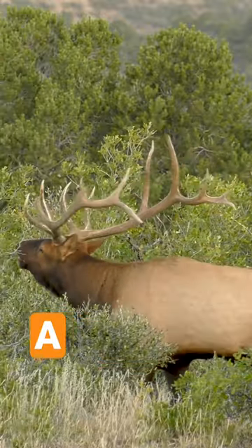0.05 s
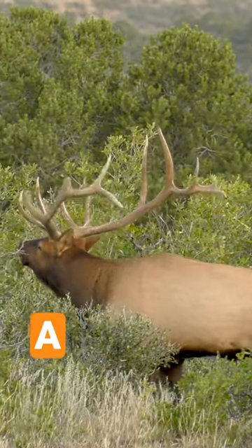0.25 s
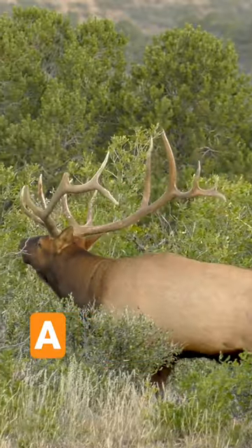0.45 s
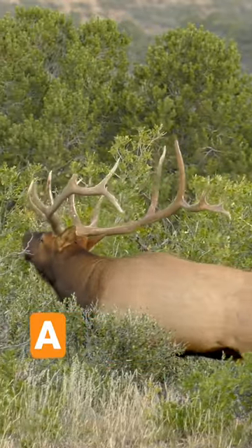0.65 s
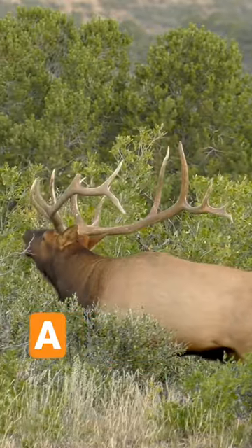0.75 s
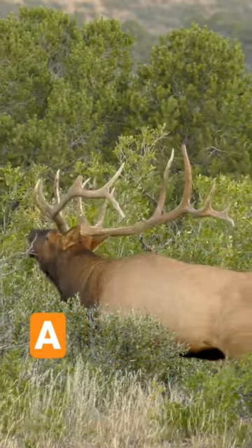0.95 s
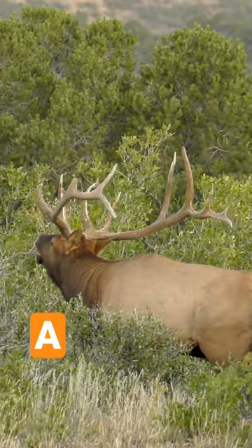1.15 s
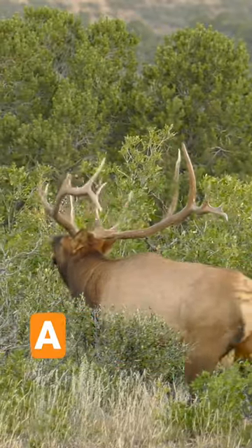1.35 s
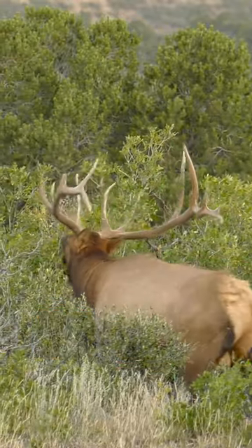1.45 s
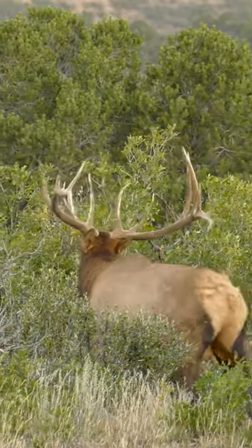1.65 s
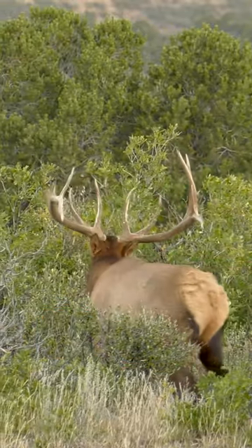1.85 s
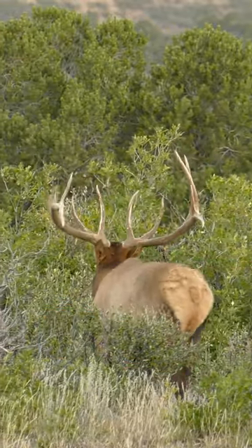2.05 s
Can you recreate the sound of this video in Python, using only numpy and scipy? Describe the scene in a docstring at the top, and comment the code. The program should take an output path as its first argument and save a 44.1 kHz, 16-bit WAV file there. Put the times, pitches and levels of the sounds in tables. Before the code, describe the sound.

Bull elk chirps a few brief, falling whistles with low grunts, over soft outdoor hiss and insects.

```python
"""Elk calling in brushy woodland

An elk gives short whistling calls, most of them falling sharply: near-sine tones that ring a long throat.
Low grunts are pulse trains mixed with noise, and puffs of air are bands of noise.
Slopes and trees throw the voice back as smeared echoes and a scattered tail.
Insects trill and buzz as bands of noise over a wavering low hum and outdoor hiss.
"""
import sys
import numpy as np
from scipy import signal
from scipy.fft import rfft, irfft
from scipy.io import wavfile
from scipy.ndimage import uniform_filter1d

SR = 44100
rng = np.random.default_rng(int(sys.argv[2]) if len(sys.argv) > 2 else 0)


def store_pcm(level_fs):
    """Save levels as 16-bit WAV."""
    pcm = np.round(np.clip(level_fs, -1, 1) * 32767).astype(np.int16)
    wavfile.write(sys.argv[1], SR, np.atleast_2d(pcm).T)


def decibels_to_gain(level_db):
    """Convert a level in decibels to a linear amplitude gain (20 dB per decade)."""
    exponent = np.asarray(level_db, float) / 20
    return 10 ** exponent


N = 92610  # samples

# Stereo balance of air, hum and echoes. Each row: frequency in Hz, left minus right in dB.
TILT = [(60, -2.5), (150, -0.5), (380, -4), (950, 0.5), (2380, -4.0), (5980, -4), (15000, -1.5)]


def evened(x):
    """Scales to rms 1."""
    return x / np.sqrt(np.mean(x ** 2) + 1e-20)


def read(points, hz):
    """Reads a spectrum table along a log frequency axis."""
    f, value = np.transpose(points)
    return np.interp(np.log(hz + 1), np.log(f + 1), value)


def curve(points):
    """Reads a (seconds, value) table at every sample."""
    s, value = np.transpose(points)
    return np.interp(np.arange(N) / SR, s, value)


def add(mix, s, sound):
    """Mixes a sound in at time s."""
    part = mix[round(s * SR):][:len(sound)]
    part += sound[:len(part)]


def wander(size):
    """Slow random drift of rms 1: noise averaged over size samples."""
    return evened(uniform_filter1d(rng.standard_normal(N), size=size))


def resonate(x, hz, width):
    """A resonance of gain 1: the sound is shifted down to 0 Hz, smoothed and shifted back."""
    turn = np.exp(2j * np.pi * hz * np.arange(len(x)) / SR)
    r = np.exp(-np.pi * width / SR)
    return 2 * (turn * signal.lfilter([1 - r], [1, -r], x / turn)).real


def steep(x, hz, width):
    """Two equal resonances in a row, scaled to rms 1."""
    return evened(resonate(resonate(x, hz, width), hz, width))


def band(hz, width):
    """Noise in a steep resonance."""
    return steep(rng.standard_normal(N), hz, width)


def whistle(rows):
    """A near sine follows its pitch and level; its weak overtones brighten with effort."""
    # Overtones. Each row: multiple of the pitch, level in dB before effort and mouth colour.
    overtones = [(2, -26), (3, -28.5)]
    # Colour the mouth gives the overtones. Each row: frequency in Hz, gain in dB.
    mouth = [(1200, -17), (1650, -23), (2000, -23), (2350, -1), (2520, -1), (2700, -4), (2850, -6),
             (3050, 5), (3700, -10), (4300, 4), (4450, -14.5), (4600, 0.5)]
    wobble_share = 0.0026  # rms, of the pitch
    brighten, loud_db = 0.13, -37.5  # dB gained for each dB of effort over loud_db
    s, hz, db = np.transpose(rows)
    t = np.arange(s[0], s[-1], 1 / SR)
    pitch = uniform_filter1d(np.interp(t, s, hz), size=88)
    wobble = wander(200)[:len(t)]
    turn = 2 * np.pi * np.cumsum(pitch * (1 + wobble_share * wobble)) / SR
    level_db = np.interp(t, s, db)
    effort_db = brighten * (level_db - loud_db)
    tone = np.sin(turn)
    for k, overtone_db in overtones:
        tone = tone + decibels_to_gain(overtone_db + effort_db + read(mouth, k * pitch)) * np.sin(k * turn)
    return np.sqrt(2) * decibels_to_gain(level_db) * tone


def whistles():
    """All whistled tones, each a sine source ahead of the throat."""
    # Whistles, one list each. Each row: time in seconds, pitch in Hz, level in dB before the throat.
    # In the first call a lower tone lingers under the break (second list), an upper one stays over
    # the fall (third) and a thin side tone joins (fourth). The eighth is a faint, far answer.
    calls = [
        [(.15, 1052, -66), (.168, 1077, -53.5), (.18, 1189, -57), (.206, 1229, -40.5), (.236, 1255, -35.5),
         (.25, 1251, -42), (.256, 1387, -38.5), (.285, 1429, -40), (.302, 1443, -35.5), (.311, 1428, -70),
         (.322, 1385, -37), (.342, 1219, -25), (.349, 1218, -29.5), (.354, 871, -40.5), (.38, 846.6, -33.5),
         (.4, 824.4, -36.5), (.405, 507, -29.5), (.42, 460, -32), (.436, 415, -29.5), (.444, 300, -50.5),
         (.455, 220, -40.5), (.475, 180, -62)],
        [(.248, 1252, -48), (.26, 1246, -46), (.29, 1280, -68), (.31, 1240, -73)],
        [(.348, 1240, -58), (.358, 1308, -29), (.368, 1278, -48), (.4, 1253, -45.5), (.44, 1294, -65),
         (.47, 1350, -79)],
        [(.325, 1640, -60), (.34, 1650, -50), (.37, 1655, -60), (.41, 1690, -57), (.45, 1710, -69)],
        [(.874, 1392, -75), (.883, 1372, -54), (.912, 1268, -47), (.928, 1196, -32.5), (.936, 1133, -39),
         (.941, 925, -40), (.946, 799, -42.5), (.952, 786, -38), (.955, 660, -41), (.959, 603, -32.5),
         (.965, 545, -64), (.971, 524, -36.5), (.977, 495, -41.5), (.981, 474, -46), (.99, 460, -56)],
        [(1.243, 1543, -73), (1.258, 1556, -39.5), (1.272, 1506, -36), (1.318, 1535, -28), (1.33, 1489, -36),
         (1.342, 1442, -33.5), (1.353, 1354, -44), (1.359, 1184, -31.5), (1.365, 995, -49.5), (1.37, 767, -43),
         (1.377, 645, -33.5), (1.382, 604, -74), (1.386, 577, -46), (1.392, 560, -60)],
        [(1.71, 1463, -97), (1.75, 1457, -54), (1.762, 1440, -53), (1.776, 1185, -43), (1.788, 821, -46),
         (1.798, 638, -39.5), (1.812, 640, -58), (1.825, 610, -64)],
        [(1.8, 1480, -66), (1.812, 1480, -50), (1.822, 1475, -68), (1.835, 1475, -53.5), (1.87, 1460, -63),
         (1.9, 1455, -66), (1.97, 1480, -67)],
        [(1.995, 660, -64), (2.008, 600, -60), (2.016, 585, -38.5), (2.028, 570, -74)],
        [(2.012, 1410, -62), (2.025, 1360, -46.5), (2.035, 1294, -59), (2.043, 1140, -50.5), (2.058, 1170, -57)],
    ]
    tone = np.zeros(N)
    for rows in calls:
        add(tone, rows[0][0], whistle(rows))
    return tone


def grunt(length, hz, db, rough):
    """Slow vocal fold pulses of sagging pitch, with noise that decays in each cycle."""
    sag, rise = 0.2, 0.45  # shares of pitch and of length
    slope = 0.5  # fall of the harmonics, as a power of their number
    u = np.arange(0, length, 1 / SR) / length
    noise = rng.standard_normal((2, SR // 5))
    jitter = evened(uniform_filter1d(noise[0], size=200))[:len(u)]
    pitch = hz * (1 - sag * (u - 0.5)) * (1 + 0.092 * rough * jitter)
    turns = np.cumsum(pitch) / SR
    folds = evened(sum(np.cos(2 * np.pi * k * turns) / k ** slope for k in range(1, 12)))
    bursts = np.exp(-(turns % 1) / 0.33) * noise[1, :len(u)]
    hiss = evened(resonate(bursts, 610, 1000))
    shape = np.minimum(u / rise, 1) * np.cos(np.pi * u / 2)
    return 2 * decibels_to_gain(db) * shape * ((1 - rough) * folds + rough * hiss)


def grunts():
    """All grunts, as fold pulses ahead of the throat."""
    # Grunts. Each row: start in seconds, length in seconds, pitch in Hz,
    # relative level in dB before the throat, roughness from 0 to 1.
    pulses = [ (0.39, 0.067, 153.2, -34.5, 0.17), (0.939, 0.056, 198.1, -47, 0.53),
              (1.341, 0.059, 195.7, -41.5, 0.2), (1.479, 0.0506, 164, -47.5, 0.5),
              (1.77, 0.035, 205.5, -44, 0.6), (1.874, 0.078, 186.9, -44.5, 0.31),
              (1.958, 0.069, 180.7, -47.5, 0.73)]
    low = np.zeros(N)
    for start, *settings in pulses:
        add(low, start, grunt(*settings))
    return low


def puffs():
    """Puffs of air from the nose: a band of noise under half-sine swells."""
    # Puffs. Each row: start in seconds, length in seconds, rms level in dB.
    breaths = [(0.946, 0.085, -60), (1.36, 0.093, -61.5), (1.793, .05, -66.5)]
    flow = np.zeros(N)
    for start, length, db in breaths:
        u = np.arange(0, length, 1 / SR) / length
        add(flow, start, decibels_to_gain(db) * np.sqrt(2) * np.sin(np.pi * u))
    return flow * band(2000, 1170)  # Hz, width in Hz


def tube(x):
    """The long throat rings at its modes."""
    # Throat modes. Each row: frequency in Hz, width in Hz, relative gain in dB.
    modes = [(302.5, 48.4, 5.5), (460, 26.5, -4.5), (640, 31.3, 7.5), (815, 51, 6.5), (1038.4, 15, 10),
             (1240, 15.7, 2.5), (1437, 17, -5), (1660, 23, -31), (2520, 40, 4)]
    return sum(decibels_to_gain(db) * resonate(x, hz, width) for hz, width, db in modes)


def elk():
    """Whistles pass both straight and ringing, grunts ring in the throat, puffs leave the nose."""
    through_db, ringing_db = -3.5, -3.5  # shares of the whistle
    tone = whistles()
    return decibels_to_gain(through_db) * tone + decibels_to_gain(ringing_db) * tube(tone) + tube(grunts()) + puffs()


def slopes(t, scatter):
    """Impulse response of the slopes: clumps of scattered taps, with a plain reflection if near."""
    # Echoes. Each row: delay in seconds, level in dB ahead of the scattered share, smear in seconds.
    reflections = [(.11, -17.5, 0.003), (0.13, -26, .006), (.24, -31, .03), (0.352, -31, .02)]
    smear_db = -5  # scattered share against the plain reflection
    near_s = 0.115  # only slopes with a shorter delay give the plain reflection
    response = np.zeros(N)
    for s, db, smear in reflections:
        plain = (s < near_s) * evened(abs(t - s) < 1 / SR)
        clump = evened(scatter * np.exp(-((t - s) / smear) ** 2))
        response += decibels_to_gain(db) * (plain + decibels_to_gain(smear_db) * clump)
    return response / np.sqrt(N)


def woodland(x):
    """Smeared echoes from the slopes and a scattered, decaying tail from the trees."""
    # The echoes grow as the head turns away. Each row: time in seconds, gain in dB.
    away = [(0, -12), (.9, -8), (1.2, -2.5), (1.7, 4.5), (2.1, 8)]
    # Colour of all that returns. Each row: frequency in Hz, gain in dB.
    wood_colour = [(200, -2), (650, -3), (1000, -3.5), (1300, -2), (1520, -0.5), (3000, -8)]
    tail_db, t60_s, rise_s = -15.5, 1.31, 0.018  # tail level before colour, decay time, swell-in
    t = np.arange(N) / SR
    taps = rng.standard_normal((2, N)) * (rng.random(N) < 0.1)  # sparse reflections
    tail = taps[0] * decibels_to_gain(-60 * t / t60_s) * np.minimum(t / rise_s, 1) ** 2
    tail = decibels_to_gain(tail_db) * tail / np.linalg.norm(tail)
    wet = signal.fftconvolve(x, tail)
    wet += signal.fftconvolve(x * decibels_to_gain(curve(away)), slopes(t, taps[1]))
    return irfft(rfft(wet[:N]) * decibels_to_gain(read(wood_colour, np.fft.rfftfreq(N, 1 / SR))), N)


def trill():
    """An insect trills: bursts of tooth clicks and noise ring in two narrow bands."""
    # Trill bands. Each row: frequency in Hz, width in Hz of each of two passes, rms level in dB.
    wing_bands = [(8460, 250, -63.5), (8120, 300, -70.5)]
    bursts_per_s, teeth_per_s = 17.42, 150
    lean, sharp = 0.68, 1.6  # lean below 1: quick rise, slow fall
    tooth_jitter, noise_share = 0.05, 0.82
    t = np.arange(N) / SR
    phase = bursts_per_s * (t + 0.983) % 1  # the shift sets where in a burst the sound opens
    burst = np.sin(np.pi * phase ** lean) ** (2 * sharp)
    jitter = wander(300)
    teeth_passed = np.cumsum(teeth_per_s * np.abs(1 + tooth_jitter * jitter)) / SR
    clicks = np.diff(np.floor(teeth_passed), prepend=0)
    clicks = evened(clicks * decibels_to_gain(0.72 * jitter))
    drive = burst * (clicks + noise_share * rng.standard_normal(N))
    return sum(decibels_to_gain(db) * steep(drive, hz, width) for hz, width, db in wing_bands)


def buzz():
    """A higher insect buzzes on and off: bands of noise with a slight flutter."""
    # Loudness of the buzz. Each row: time in seconds, level in dB.
    buzz_level = [(0.0, -66), (0.02, -68), (0.36, -67), (0.44, -71), (0.51, -67), (0.54, -76), (0.67, -82),
                  (0.69, -70), (0.74, -80), (1.58, -65), (2.09, -65.5), (2.1, -76)]
    # Buzz bands. Each row: frequency in Hz, width in Hz of each of two passes, relative level in dB.
    buzz_bands = [(13630, 1000, -5), (14300, 390, -5), (15600, 1300, -4.5)]
    flutter = decibels_to_gain(0.5 * wander(300))  # 0.5 dB rms
    noise = sum(decibels_to_gain(db) * band(hz, width) for hz, width, db in buzz_bands)
    return decibels_to_gain(curve(buzz_level)) * evened(flutter * noise)


def chorus():
    """Far insects fill the trill's band with noise, a little of it opposite left and right."""
    # Loudness of the chorus. Each row: time in seconds, level in dB.
    chorus_level = [(0, -73), (1, -68), (2.1, -62)]
    middle = decibels_to_gain(curve(chorus_level)) * band(8500, 300)
    side = decibels_to_gain(-77.5) * band(8300, 600)
    return middle + np.array([side, -side])


def hum():
    """A distant low hum: steady tones whose pitch wavers."""
    # Hum tones. Each row: frequency in Hz, rms wavering in Hz, level in dB before the stereo balance.
    hum_tones = [(85, 2.6, -66), (127.2, 3.65, -60), (155, 2.86, -59)]
    total = np.zeros(N)
    for hz, waver, db in hum_tones:
        turns = np.cumsum(hz + waver * wander(3000)) / SR
        total += decibels_to_gain(db) * np.sqrt(2) * np.sin(2 * np.pi * turns)
    return total


def placed(x):
    """Puts a sound into left and right with their balance over frequency."""
    tilt = decibels_to_gain(read(TILT, np.fft.rfftfreq(N, 1 / SR)) / 2)
    return irfft(rfft(x) * np.array([tilt, 1 / tilt]), N)


def air():
    """Outdoor hiss and rumble: shaped stereo noise with drifting patches and a slow swell."""
    # Colour of the air. Each row: frequency in Hz, relative level in dB per Hz.
    air_colour = [(12, -24), (20, 3.5), (74, -11.5), (110, -4.5), (141, 0.5), (228, -14), (376, -8),
                  (471, -13.5), (588, -8), (823, -14.5), (1180, -16.5), (1500, -22), (2130, -25),
                  (4530, -26.5), (5820, -29), (7280, -28.5), (8370, -26.5), (9630, -32.5), (14200, -36.5),
                  (15900, -53)]
    # Stereo likeness. Each row: frequency in Hz, left-right likeness up to 1.
    likeness = [(25, 0.91), (60, 1), (180, 0.98), (550, 0.94), (1650, 0.99), (4000, 1), (8000, 1),
                (15000, 0.92)]
    air_db, patch_db, swell_db = -50.5, 1.12, 0.66  # all rms
    frames, hz = N // 512 + 5, np.fft.rfftfreq(2048, 1 / SR)
    a, b, c, d, patches = rng.standard_normal((frames, 1025, 5)).T
    patches = uniform_filter1d(patches, size=20, axis=0)  # over frequency
    patches = evened(uniform_filter1d(patches, size=6, axis=1))  # over time
    swell = evened(uniform_filter1d(rng.standard_normal(frames), size=20))
    same = np.clip(read(likeness, hz), -1, 1)[:, None]
    left = a + 1j * b
    right = same * left + np.sqrt(1 - same ** 2) * (c + 1j * d)
    tilt = read(TILT, hz)[:, None] / 2
    level_db = read(air_colour, hz)[:, None] + patch_db * patches + swell_db * swell
    spectra = np.array([left, right]) * decibels_to_gain(level_db + np.array([tilt, -tilt]))
    noise = signal.istft(spectra, nperseg=2048, noverlap=1536)[1][:, :N]
    return decibels_to_gain(air_db) * evened(noise)


def scene():
    """The elk in the middle, its echoes, the insects, the hum and the air."""
    voice = elk()
    insects = trill() + buzz() + chorus()
    return voice + placed(woodland(voice) + hum()) + insects + air()


def low_pass(x):
    """Removes everything above the highest recorded frequency."""
    return signal.sosfilt(signal.butter(12, 16070, fs=SR, output="sos"), x)


def record(dry):
    """Band limit: a steep low-pass at 16050 Hz takes off the top of the mix."""
    lowpass = signal.firwin(511, 16050, window=("kaiser", 9), fs=SR)
    mix = signal.oaconvolve(dry, lowpass[None], "same")
    return low_pass(mix)


dry = scene()
out = record(dry)
store_pcm(out)
```